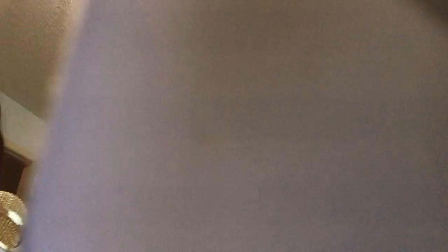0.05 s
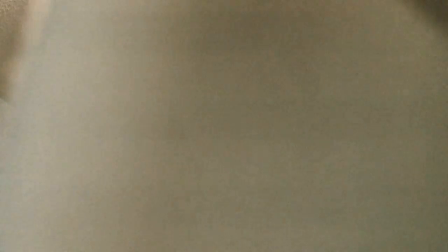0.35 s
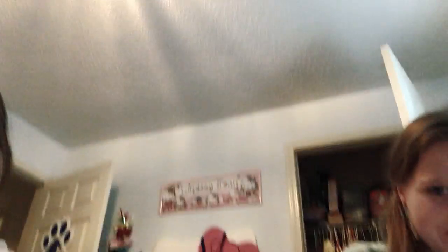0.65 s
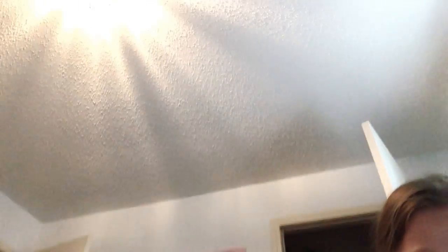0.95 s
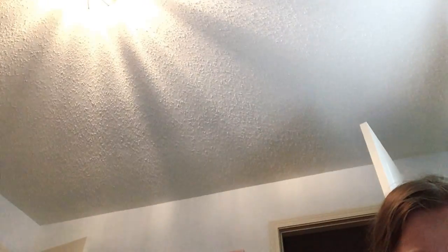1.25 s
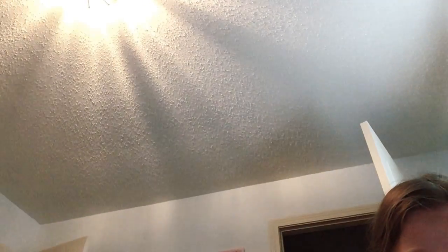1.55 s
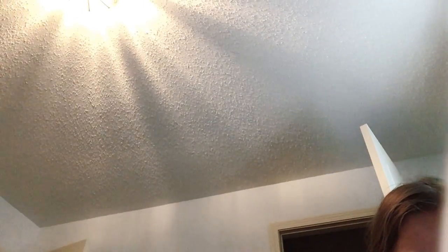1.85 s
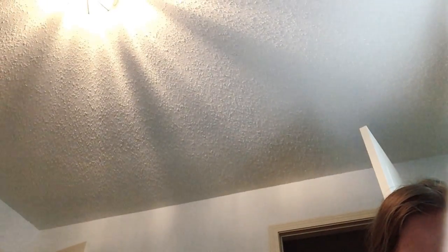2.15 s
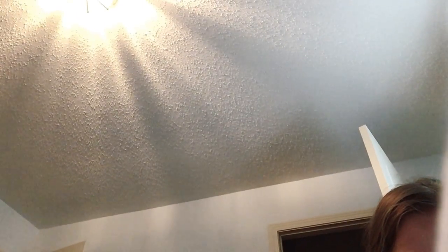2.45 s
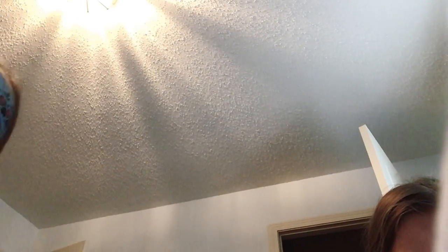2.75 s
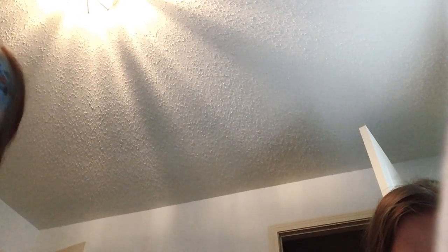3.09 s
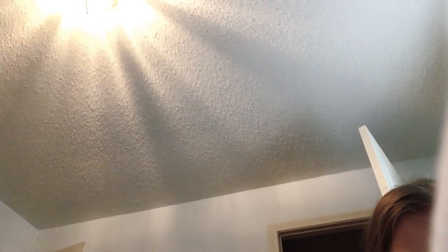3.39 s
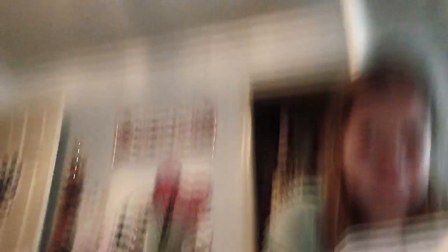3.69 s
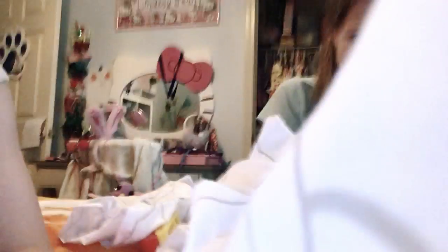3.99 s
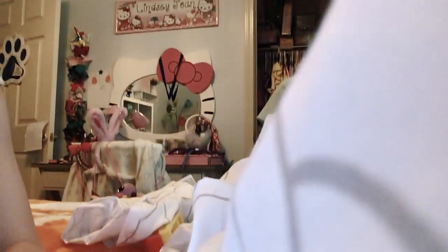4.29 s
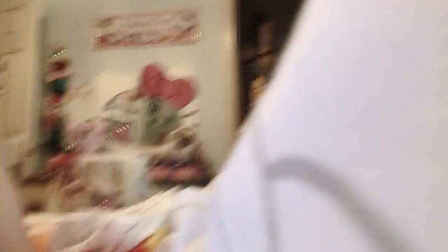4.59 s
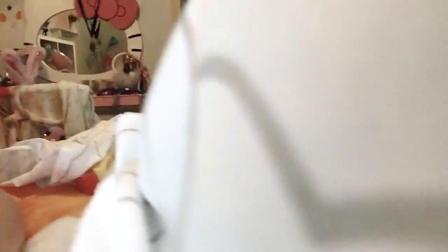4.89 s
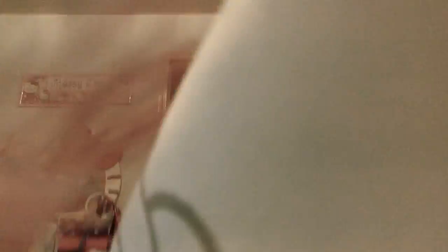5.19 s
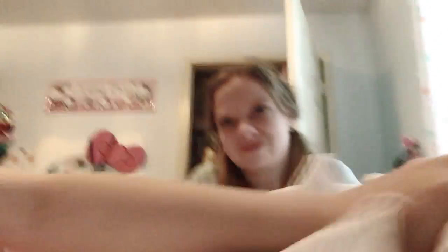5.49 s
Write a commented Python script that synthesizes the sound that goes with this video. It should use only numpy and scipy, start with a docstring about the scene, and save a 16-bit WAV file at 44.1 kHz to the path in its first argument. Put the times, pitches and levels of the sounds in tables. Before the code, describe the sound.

Cloth rubs right against a phone microphone in rasping scuffs and soft thumps, with a short lull of faint finger taps.

```python
"""A bedroom, right at a phone's microphone port: cloth rubs over it as the phone is propped up
and then picked up again. Slipping fibres rasp and hiss; pressed fabric drags on the case, pumps air
into the port and turns hollow as it seals it. Threads snap and folds thump. In the lull, fingers
tick, knock and squeak on the case, and something rings faintly over the quiet room tone.
The last fold slides off with a thin lisp."""
import sys
import numpy as np
from scipy import signal
from scipy.fft import rfft, irfft, next_fast_len
from scipy.io import wavfile
from scipy.ndimage import uniform_filter1d, map_coordinates

SR = 44100
rng = np.random.default_rng(int(sys.argv[2]) if len(sys.argv) > 2 else 0)


def transcribe(signal):
    """Save signal, clipped to [-1, 1], as a 16-bit WAV file at the path in sys.argv[1]."""
    frames = np.atleast_2d(signal).T
    limited = np.clip(frames, -1, 1)
    pcm = np.round(limited * 32767).astype(np.int16)
    wavfile.write(sys.argv[1], SR, pcm)


N = 248761
TOP_HZ = 15900  # the phone's band limit

# room tone: freq_hz, level_db
ROOM_SPECTRUM = [(25, -33), (70, -11), (200, -14), (400, 5.5), (600, -26), (800, -32), (1600, -8),
                 (4000, -14), (12000, -14.5), (15500, -54)]
# fingers knocking on the case: start_s, peak_db, cutoff_hz
FINGER_KNOCKS = [(2.8108, -32.5, 3500), (2.846, -39, 1000), (2.87, -51, 1100), (2.877, -39, 700),
                 (2.925, -46, 600), (2.965, -43.5, 400)]
# resonances of the case: pitch_hz, level_db, t60_s
CASE_MODES = [(332, 3, 0.032), (515, -0.5, 0.048), (940, 7.5, 0.013), (1410, 11.5, 0.0067),
              (2180, 16.5, 0.0096), (2900, 4, 0.021)]
# folds pushing air into the port: start_s, peak_db, start_pitch_hz
FOLD_PUSHES = [(.285, -38, 113), (0.327, -38, 264), (.42, -45.5, 99), (.564, -18.5, 720),
               (0.595, -17.5, 420), (0.6, -18, 233), (.696, -23.5, 163), (.835, -31.5, 129),
               (1.851, -42.5, 126), (2.366, -43, 111), (2.93, -38, 107), (3.129, -41, 136),
               (3.366, -43, 109), (3.479, -42, 330), (3.58, -30, 113), (3.704, -13.5, 324),
               (3.946, -25.5, 198), (4.013, -18.5, 354), (4.024, -25.5, 111), (4.629, -37.5, 433),
               (4.714, -22, 201), (4.786, -33.5, 420), (5.303, -27, 268), (5.35, -24, 191),
               (5.449, -24.5, 143.4), (5.532, -27.5, 115)]
# threads and seams snapping past the port: start_s, peak_db, pitch_hz
THREAD_SNAPS = [(0.0249, -28.5, 1850), (0.053, -32.5, 2530), (0.1199, -19.5, 3550), (0.2902, -39, 3300),
                (0.312, -39.5, 2830), (0.376, -30.5, 2660), (.4, -46, 2900), (1.1565, -25.5, 2950),
                (1.366, -31.5, 2600), (1.3977, -40, 3860), (2.1179, -36.5, 1890), (2.779, -40.5, 2900),
                (2.8114, -39, 2600), (2.9134, -37, 2100), (2.986, -44, 2730), (3.1649, -44, 2420),
                (3.3785, -39.5, 2340), (3.3928, -39, 2380), (3.6589, -6.5, 9300), (4.785, -41, 1870)]
# fade of the smooth fabric sliding off: time_s, level_db
SLIDE_FADE = [(5.4, -100), (5.5, -42.5), (5.56, -52), (5.64, -61)]
# tone colours of the cloth layers: freq_hz, level_db
SLIDE_SPECTRUM = [(5500, -30), (7600, -14), (8800, -3), (12800, -3), (14000, -8), (15800, -23.5)]  # smooth fabric, all top end
RASP_SPECTRUM = [(200, -15), (600, -3.5), (1000, 0), (1600, 2.5), (2500, 2), (4000, -1), (5200, -20),
                 (6500, -14.5), (9000, -42), (16000, -67)]  # midrange bite of the fibres
HISS_SPECTRUM = [(2500, -26.5), (4500, 1.5), (5800, 0), (7200, -4.5), (8600, -1), (10500, -4), (12800, -4),
                 (14200, -8.5), (15600, -17), (16200, -40)]  # their fine treble
DRAG_SPECTRUM = [(90, -43), (170, 0.5), (240, 3), (330, 2.5), (430, -3), (700, -10), (900, -18),
                 (1400, -16.5), (4000, -52)]  # low body of fabric on the case
AIR_SPECTRUM = [(20, -36), (35, -27.5), (50, -3.5), (80, 1.5), (120, -1.5), (170, -6), (240, -11.5),
                (500, -68), (2000, -90)]  # rumble of air in the port
# how closely the cloth seals the port: time_s, seal_fraction
PORT_SEAL = [(0, 0), (.65, 0.6), (.75, 0.01), (2.1, 0.2), (3.3, 0.4), (3.6, 0.5), (4.2, 1), (5.64, 0.86)]
# a sealed port gains a hollow resonance and loses its bite: freq_hz, gain_db
SEALED_EQ = [(250, -1.5), (430, -1.5), (600, 5), (760, 8), (950, 5.5), (1400, 1.5), (2400, -2.5),
             (4000, -4), (6000, -2), (9500, 1), (13000, 2)]
# cloth strokes, with hiss and pressure relative to the rasp:
# start_s, length_s, rasp_db, swell_db, hiss_db, pressure_db
CLOTH_STROKES = [(-.03, 0.17, -55, -4, -4, 4.5), (.18, 0.19, -63, -6.5, -3, 9.5),
                 (0.51, .07, -32, 8.5, -10, 0), (0.576, 0.082, -29.5, 1.5, -5.5, 1),
                 (0.669, .12, -35, -3.5, -1, -3), (0.766, 0.16, -35, -5.5, -6, -9.5),
                 (.935, 0.22, -52.5, 5, -5.5, -3.5), (1.119, .13, -47, -1.5, -7, -3),
                 (1.29, 0.079, -54.5, 5.5, -5.5, -4), (1.372, .135, -59, 2, -3.5, -1.5),
                 (1.487, 0.33, -50, 3.5, -4, -4), (1.86, .165, -49.5, 3, -8.5, -3),
                 (2.015, 0.072, -57.5, -6, -7, 1.5), (2.267, 0.047, -65.5, 2, -7.5, 5.5),
                 (2.36, .08, -66, -4, -8, 6), (2.77, .225, -71, 2, -5, 10.5),
                 (3.093, 0.067, -67.5, 2.5, -4, 11), (3.318, .085, -67.5, 3, -2, 9.5),
                 (3.417, 0.14, -73, 1, 3, 17), (3.549, 0.11, -46.5, 8, -4.5, 5),
                 (3.614, 0.16, -39, -4.5, -5.5, 2), (3.773, .06, -39.5, -1, -5, 4.5),
                 (3.829, 0.14, -42, 5, -4.5, 2.5), (3.976, .078, -46.5, -6, -4.5, 8),
                 (4.046, .13, -58.5, -1, -6.5, 8), (4.195, 0.15, -58.5, 0, -8, 9),
                 (4.392, 0.17, -57.5, 5, -7, 7.5), (4.614, 0.082, -48, 2, -6, 6.5),
                 (4.704, 0.23, -58, 12.5, -5.5, 6), (5.003, .24, -49.5, 2.5, -5, 5),
                 (5.288, .035, -45.5, 0, -5, 9.5), (5.317, .105, -35.5, -1, -3.5, 2.5),
                 (5.397, 0.11, -38, -5.5, .5, 3), (5.505, .125, -59.5, -9.5, 1, 10.5)]
# release stretch, as pressed fabric settles late: rasp_ratio, hiss_ratio, drag_ratio, air_ratio
RELEASE_STRETCH = (1.07, 1.02, 1.45, 2)
# cloth barely stirring between strokes: rasp_db, hiss_db, drag_db, air_db
RESTING_LEVELS = (-78.5, -82, -70, -65)


def amp(db):
    """Decibels to gain."""
    return 10 ** (np.asarray(db) / 20)


def unit(x):
    """Scale to rms 1."""
    return x / np.sqrt(np.mean(x ** 2) + 1e-20)


def automation(points):
    """Straight ramps through (time_s, value) points, one value a sample."""
    return np.interp(np.arange(N) / SR, *np.transpose(points))


def wobble(rate_hz):
    """A smooth random curve with rate_hz knots a second."""
    return map_coordinates(rng.standard_normal(N // 20), [np.arange(N) * rate_hz / SR], mode="wrap")


def filtered(x, response):
    """Filter x by a gain given as a function of frequency."""
    size = next_fast_len(N + SR // 2)
    return irfft(rfft(x, size) * response(np.fft.rfftfreq(size, 1 / SR)), size)[:N]


def eq(x, spectrum):
    """Equalise x through (freq_hz, gain_db) points."""
    freq_hz, gain_db = np.transpose(spectrum)
    return filtered(x, lambda hz: amp(np.interp(np.log(hz + 1), np.log(freq_hz), gain_db)))


def coloured(x, spectrum):
    """Equalise x and bring it to rms 1."""
    return unit(eq(x, spectrum))


def add(track, start_s, sound, peak_db):
    """Mix a sound in at the given time and peak level."""
    place = track[round(start_s * SR):][:len(sound)]
    place += (amp(peak_db) * sound / np.abs(sound).max())[:len(place)]


def room_tone(hum_hz=82.3, hum_db=-73, wash_db=-76.5):
    """The quiet bedroom: a soft wash and a faint hum."""
    hum = amp(hum_db) * np.sqrt(2) * np.sin(2 * np.pi * hum_hz * np.arange(N) / SR)
    return hum + amp(wash_db) * coloured(rng.standard_normal(N), ROOM_SPECTRUM)


def faint_ring(start_s=2.61, pitch_hz=587, t60_s=1.1, peak_db=-70):
    """Something light, perhaps a bed spring, rings thinly in the lull."""
    track, t = np.zeros(N), np.arange(SR // 2) / SR
    envelope = amp(-60 * t / t60_s) * signal.windows.tukey(len(t), 0.1)
    add(track, start_s, np.sin(2 * np.pi * pitch_hz * t) * envelope, peak_db)
    return track


def finger_squeak(start_s=3.112, end_s=3.16, pitch_hz=478, tilt_db=-6, peak_db=-44):
    """A fingertip sticks and slips roughly on the case, sinking in pitch as it slows."""
    track, n = np.zeros(N), int((end_s - start_s) * SR)
    jitter = 0.1 * wobble(rate_hz=400)[:n]
    judder_db = 3.5 * wobble(rate_hz=300)[:n]
    glide = np.linspace(0.06, -0.08, n)
    phase = 2 * np.pi * np.cumsum(pitch_hz * (1 + glide + jitter)) / SR
    tone = sum(amp(tilt_db * k) * np.sin((k + 1) * phase) for k in range(4))
    add(track, start_s, tone * amp(judder_db) * signal.windows.tukey(n, 0.5), peak_db)
    return track


def finger_knocks(attack_s=0.0019):
    """Each knock rings the case; a soft fingertip dulls the high modes and the grip detunes them all."""
    track, t = np.zeros(N), np.arange(SR // 10) / SR
    for start_s, peak_db, cutoff_hz in FINGER_KNOCKS:
        grip = 1 + rng.normal(0, 0.07, len(CASE_MODES))
        ring = np.zeros(len(t))
        for (pitch_hz, level_db, t60_s), detune in zip(CASE_MODES, grip):
            envelope = amp(level_db - 60 * t / t60_s) / (1 + (pitch_hz / cutoff_hz) ** 2)
            ring += envelope * np.sin(2 * np.pi * pitch_hz * detune * t)
        add(track, start_s, ring * (1 - np.exp(-t / attack_s)), peak_db)
    return track


def grip_ticks(start_s=2.1, end_s=3.1, peak_db=-55, pitch_hz=2300, count=14):
    """Fingers shifting their grip free faint ticks. Gives cues: start_s, peak_db, pitch_hz."""
    return [(start_s + (end_s - start_s) * (k + rng.random()) / count,
             peak_db + 3 * rng.normal(),
             pitch_hz * np.exp(0.32 * rng.normal())) for k in range(count)]


def fabric_slide():
    """As the last fold slides away, only a thin, high lisp is left."""
    level_db = automation(SLIDE_FADE) + 0.8 * wobble(rate_hz=42)
    return amp(level_db) * coloured(rng.standard_normal(N), SLIDE_SPECTRUM)


def fold_pushes(rise_cycles=0.57, sag=0.75, sag_cycles=2.04, tail_gain=0.062, tail_cycles=3.2):
    """A fold shoves the air in the port, which swings back ever more slowly as the fabric relaxes."""
    track, t = np.zeros(N), np.arange(SR // 10) / SR
    for start_s, peak_db, start_pitch_hz in FOLD_PUSHES:
        cycles = start_pitch_hz * t
        pitch_hz = start_pitch_hz * (1 - sag * (1 - np.exp(-cycles / sag_cycles)))
        shove = cycles * np.exp(-cycles / rise_cycles) + tail_gain * np.exp(-cycles / tail_cycles)
        add(track, start_s, np.sin(2 * np.pi * np.cumsum(pitch_hz) / SR) * shove, peak_db)
    return track


def thread_snaps(cues, band_ratio=1.96, crackle_gain=0.042, crackle_t60_s=0.02):
    """A released thread gives one dry, broad tick, with a short crackle behind it."""
    track, t = np.zeros(N), np.arange(SR // 50) / SR
    for start_s, peak_db, pitch_hz in cues:
        crackle = crackle_gain * rng.standard_normal(len(t)) * amp(-60 * t / crackle_t60_s)
        tick = (t == 0) + crackle
        edges_hz = [pitch_hz / band_ratio, min(pitch_hz * band_ratio, TOP_HZ)]
        band = signal.butter(1, edges_hz, "bandpass", fs=SR)
        add(track, start_s, signal.lfilter(*band, signal.lfilter(*band, tick)), peak_db)
    return track


def fibre_slips(rate_hz, scatter_db):
    """Fibres let go as tiny random clicks; the mean power holds steady however dense they get."""
    chance = np.clip(rate_hz / SR, 1e-4, 1)
    sizes = amp(scatter_db * np.clip(rng.standard_normal(N), -2, 2))
    polarity = np.sign(rng.standard_normal(N))
    return unit((rng.random(N) < chance) * sizes * polarity / np.sqrt(chance))


def air_pockets(x, depth_db, frame=1024):
    """Air pockets between the folds form and collapse: short-lived peaks wander through the spectrum."""
    _, _, spectra = signal.stft(x, SR, nperseg=frame)
    peaks = uniform_filter1d(rng.standard_normal(spectra.shape), size=3, axis=0)  # smooth in frequency
    peaks = unit(uniform_filter1d(peaks, size=4, axis=1))  # and in time
    _, shaped = signal.istft(spectra * amp(depth_db * peaks), nperseg=frame)
    return unit(shaped[:N])


def stroke_levels(attack_s=0.045, release_s=0.066):
    """Each stroke rises, swells or eases, then dies away. Gives rasp, hiss, drag and air faders in dB."""
    t = np.arange(N) / SR
    levels_db = np.outer(RESTING_LEVELS, np.ones(N))
    fall_db_per_s = 20 / release_s / np.array(RELEASE_STRETCH)[:, None]
    for start_s, length_s, rasp_db, swell_db, hiss_db, pressure_db in CLOTH_STROKES:
        age_s = t - start_s
        rise = np.sin(np.pi / 2 * np.clip(age_s / attack_s, 1e-3, 1)) ** 2
        progress = np.clip(age_s / length_s, 0, 1)
        stroke_db = rasp_db + swell_db * (progress - 0.5) + 20 * np.log10(rise)
        fall_db = fall_db_per_s * np.maximum(age_s - length_s, 0)
        air_db = 1.15 * pressure_db - 1  # pressing harder adds air as well as drag
        balance_db = np.array([0, hiss_db, pressure_db, air_db])[:, None]
        levels_db = np.maximum(levels_db, stroke_db + balance_db - fall_db)
    return levels_db


def cloth_rub():
    """Cloth scrapes over the port; a faster stroke frees more fibres, so crackle thickens into rasp."""
    rasp_db, hiss_db, drag_db, air_db = stroke_levels()
    seal = np.clip(automation(PORT_SEAL), 0, 1)
    speed = amp(rasp_db + 50)
    crackle = fibre_slips(rate_hz=300 + 1100 * speed * (1 + 3 * seal), scatter_db=4.5)
    fibres = unit(crackle + 0.8 * rng.standard_normal(N))
    catch_db = wobble(rate_hz=160) + 1.32 * wobble(rate_hz=26)  # the weave catches and lets go
    rasp = amp(rasp_db + catch_db - 0.8) * coloured(air_pockets(fibres, depth_db=1.53), RASP_SPECTRUM)
    hiss = amp(hiss_db + 0.43 * catch_db - 1.46) * coloured(fibres, HISS_SPECTRUM)
    drag_grain = air_pockets(fibre_slips(rate_hz=1500, scatter_db=2), depth_db=2)
    drag = amp(drag_db + catch_db - 1.15) * coloured(drag_grain, DRAG_SPECTRUM)
    flutter_db = 0.78 * wobble(rate_hz=79)
    air = amp(air_db + flutter_db + 0.33) * coloured(rng.standard_normal(N), AIR_SPECTRUM)
    rub = rasp + hiss + drag + air
    return (1 - seal) * rub + seal * eq(rub, SEALED_EQ)


def scene():
    """A dry mono mix: the handling happens right at the microphone."""
    handling = cloth_rub() + fabric_slide() + thread_snaps(THREAD_SNAPS + grip_ticks()) + fold_pushes()
    return (handling + finger_knocks() + finger_squeak() + faint_ring() + room_tone())[None]


def record(dry):
    """The phone cuts the deepest bass and everything above its band limit."""
    def response(hz, low_cut_hz=36):
        high_cut = np.clip((TOP_HZ - hz) / 100, 0, 1)
        return high_cut * hz ** 2 / np.sqrt(hz ** 4 + low_cut_hz ** 4)
    return filtered(dry[0], response)[None]


dry = scene()
out = record(dry)
transcribe(out)
```